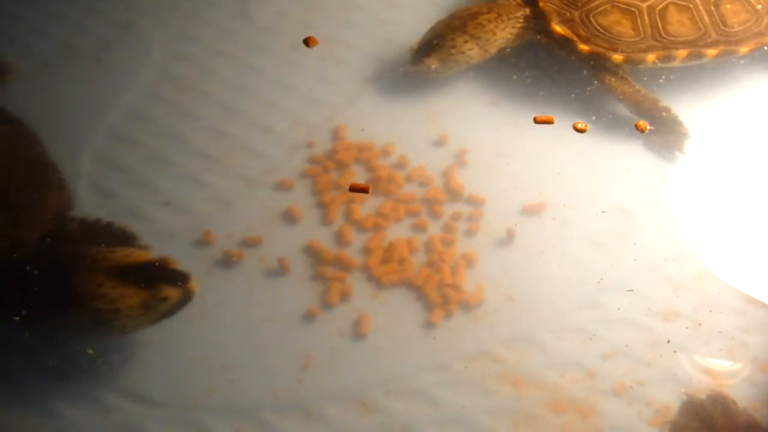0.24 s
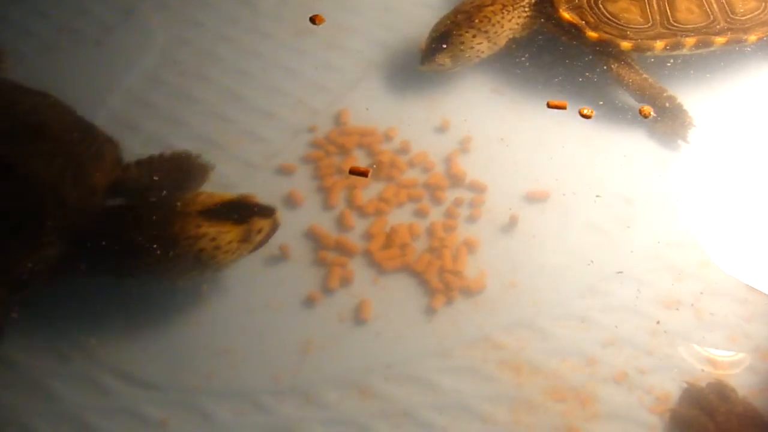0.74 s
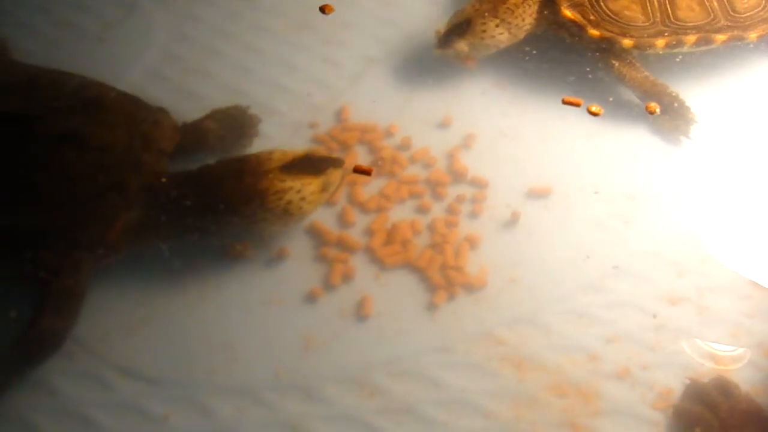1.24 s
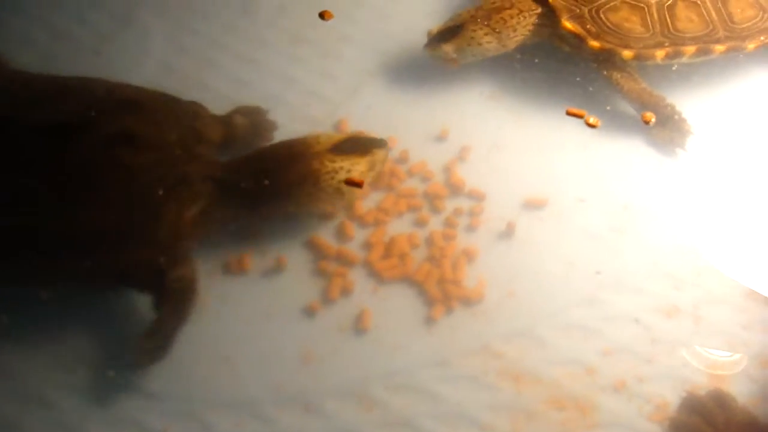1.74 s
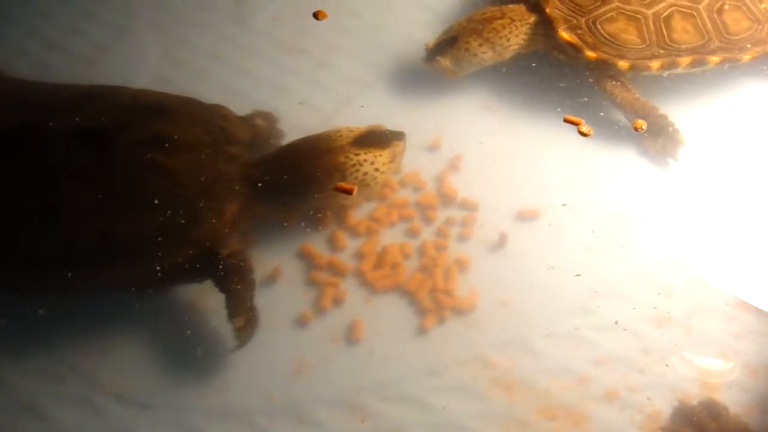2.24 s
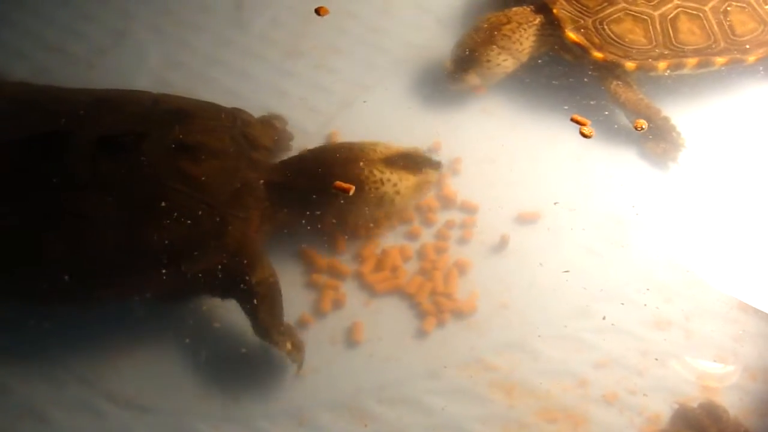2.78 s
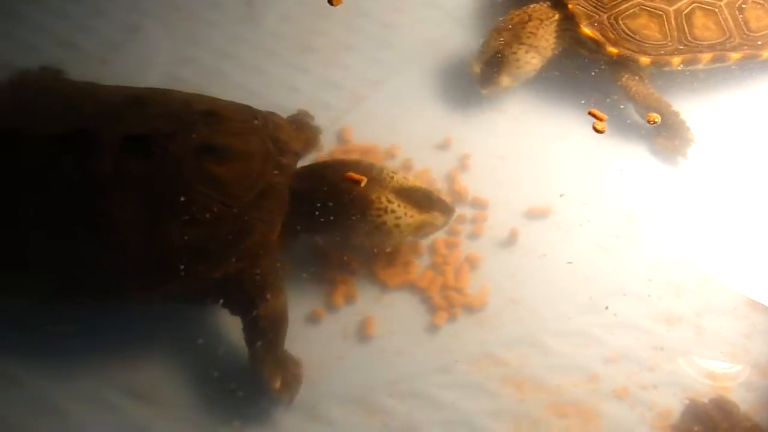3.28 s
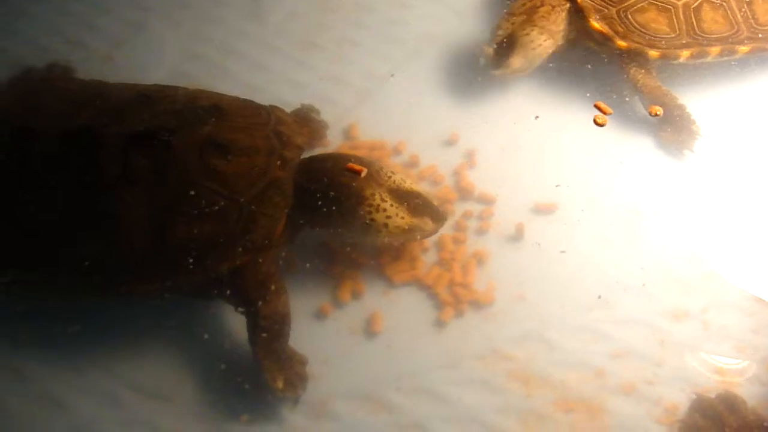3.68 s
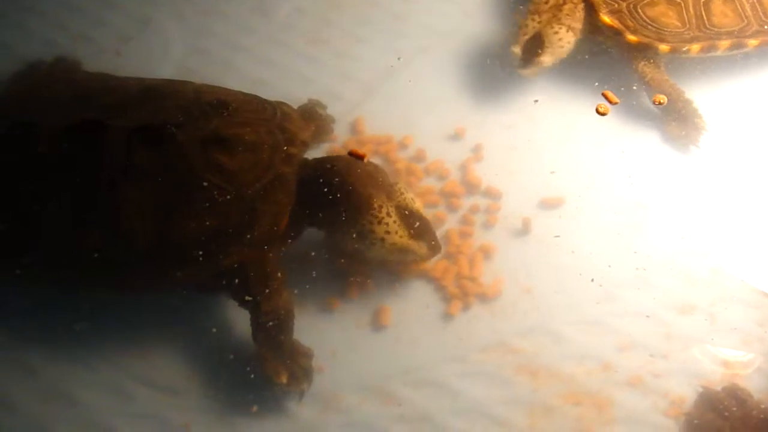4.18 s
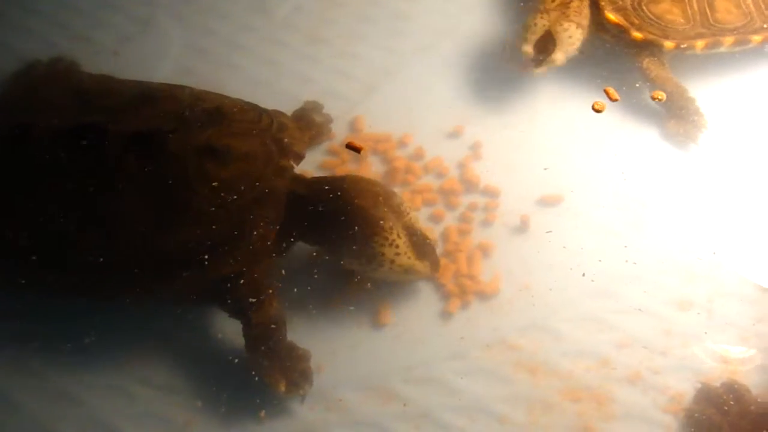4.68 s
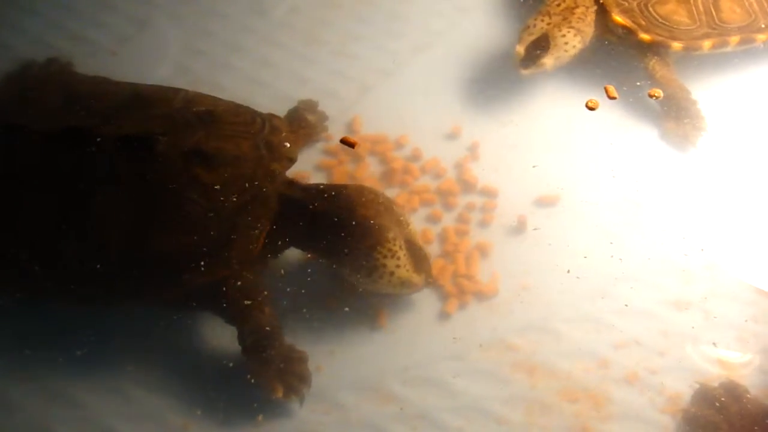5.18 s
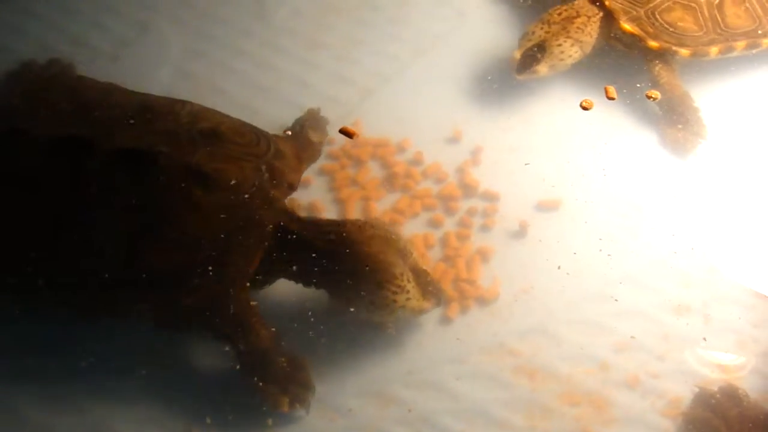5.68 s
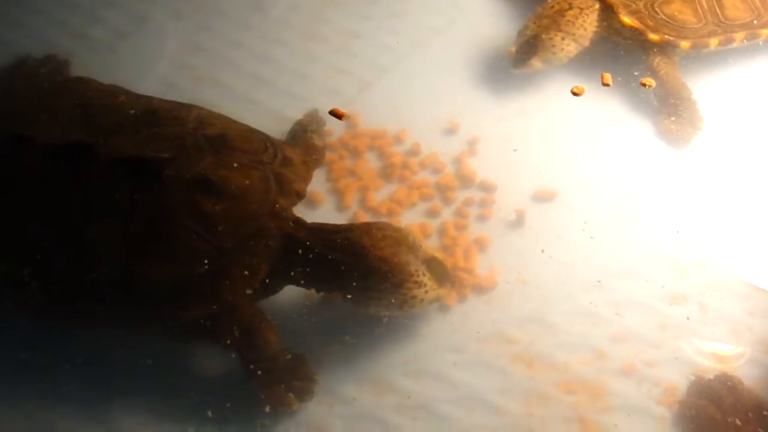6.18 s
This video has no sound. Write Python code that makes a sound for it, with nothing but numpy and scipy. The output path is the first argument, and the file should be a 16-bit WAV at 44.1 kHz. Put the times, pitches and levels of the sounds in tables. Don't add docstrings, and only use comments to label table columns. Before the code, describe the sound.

Close-up trickling, splashing water full of small bubbles, scattered plops and sharp little slaps echoing briefly in a tub, a pump humming quietly behind.

```python
import sys
import numpy as np
from scipy import signal
from scipy.fft import rfft, irfft, next_fast_len
from scipy.io import wavfile
from scipy.ndimage import uniform_filter1d, map_coordinates

SR = 44100
rng = np.random.default_rng(int(sys.argv[2]) if len(sys.argv) > 2 else 0)


def voltage_ratio(level):
    return 10 ** (np.asarray(level, float) / 20)


def transcribe(signal):
    frames = np.atleast_2d(signal).T
    limited = np.clip(frames, -1, 1)
    pcm = np.round(limited * 32767).astype(np.int16)
    wavfile.write(sys.argv[1], SR, pcm)


N = 283563


def along(points, hz):
    f, v = np.transpose(points)
    return np.interp(np.log(hz + 1), np.log(f + 1), v)


def unit(x):
    return x / np.sqrt(np.mean(x ** 2) + 1e-20)


def wobble(rate_hz):
    knots = rng.standard_normal(int(N * rate_hz / SR) + 4)
    return map_coordinates(knots, [np.arange(N) * rate_hz / SR])


def filtered(x, response):
    m = next_fast_len(N + 8192)
    return irfft(rfft(x, m) * response(np.fft.rfftfreq(m, 1 / SR)), m)[..., :N]


def rush(spectrum, patchy_db, wide_bins=4, long_frames=12):
    z = signal.stft(rng.standard_normal(N + 512), nperseg=256)[2]
    field = uniform_filter1d(rng.standard_normal(z.shape), size=wide_bins, axis=0)
    field = uniform_filter1d(field, size=long_frames, axis=1)
    x = signal.istft(z * voltage_ratio(patchy_db * unit(field)), nperseg=256)[1][:N]
    return unit(filtered(x, lambda hz: voltage_ratio(along(spectrum, hz))))


def drops(rows, echo_db, rise, size=4096):
    start_s, peak_db, pitch_hz, cycles, t60_s, slap_db = np.transpose(rows)[:, :, None]
    late_s, early_s, early_db = .0008, .007, -6
    t = np.arange(size) / SR

    age = np.minimum(pitch_hz * t / np.clip(cycles, 1, 30), 4)
    bubble = np.sin(2 * np.pi * pitch_hz * t * (1 + rise * (age - .5)))
    bubble = bubble * age ** .5 * np.exp(-2 * age) * (age < 4)
    bubble /= np.abs(bubble).max(axis=1, keepdims=True)
    u = t / .00004
    slap = 3 * voltage_ratio(slap_db) * (1 - u) * np.exp(-u)
    source = bubble + slap

    decay_db = -60 * t / np.clip(t60_s, .02, .3)
    dying = voltage_ratio(decay_db) + voltage_ratio(0.5 + 0.16 * decay_db) * (1 - t / t[-1])
    dying = dying * (1 + voltage_ratio(early_db) * np.exp(-(t / early_s) ** 4))
    echoes = rng.standard_normal((len(start_s), size)) * dying * (1 - np.exp(-t / 0.00037))
    clumps = np.repeat(rng.standard_normal((len(start_s), size // 128)), 128, axis=1)
    echoes *= voltage_ratio(2.2 * clumps)
    echoes *= voltage_ratio(echo_db) / np.linalg.norm(echoes, axis=1, keepdims=True)
    echoes[:, 0] = 1

    def strength(v):
        return np.linalg.norm(v, axis=1, keepdims=True)

    sound = irfft(rfft(source) * rfft(echoes))
    sound *= voltage_ratio(peak_db) * strength(source) * strength(echoes) / strength(sound)
    at = np.round(np.clip(start_s + late_s, 0, None) * SR).astype(int) + np.arange(size)
    return np.bincount(at.ravel(), sound.ravel(), N + size)[:N]


def fizz(count, spread_db, cycles, t60_s, slap_db):
    # pitch_hz, level_db
    sizes = [(400, -13.5), (1000, -1.5), (2500, 4.5), (4500, 9.5), (7000, 11.5), (10500, 7.5)]
    when, size, loud, life = rng.random((count, 4)).T
    pitch_hz = 400 * (10500 / 400) ** size
    level_db = along(sizes, pitch_hz) - spread_db * np.log(loud + .15)
    life_cycles = cycles * (0.36 + 2 * life ** 2)
    same = np.ones(count)
    rows = np.transpose([when * N / SR, level_db, pitch_hz, life_cycles, t60_s * same, slap_db * same])
    return unit(drops(rows, echo_db=5.5, rise=0.034, size=2048))


def walls(x, echo_db, t60_s):
    t = np.arange(SR // 4) / SR
    path = rng.standard_normal(len(t)) * voltage_ratio(-60 * t / t60_s) * (t > .008)
    return x + voltage_ratio(echo_db) * signal.fftconvolve(x, path / np.linalg.norm(path))[:N]


def tub(hz):
    # centre_hz, width_hz, level_db over the flat path
    modes = [(1245, 110, -3.5), (1820, 140, -13.5), (2260, 250, -12), (4100, 1030, -10.5),
             (6270, 3300, -34)]
    return 1 + sum(voltage_ratio(db) * 1j * hz * w / (c * c - hz * hz + 1j * hz * w) for c, w, db in modes)


def stream():
    # start_s, strength_db
    flow = [(0.0, -35.5), (1.23, -34.5), (1.59, -34), (2.09, -34.5), (3.08, -34), (4.21, -37),
            (4.49, -35.5), (4.94, -35), (5.14, -36), (6.05, -35), (6.43, -33.5)]
    # freq_hz, density_db [dB per Hz]
    gurgle_spectrum = [(320, -27), (550, -3.5), (601, -8), (825, -2.5), (1250, -0.5), (1510, -3),
                       (1770, -0.5), (2380, -1.5), (3200, -4.5), (4160, -10), (7040, -120)]
    # freq_hz, density_db [dB per Hz]
    splash_spectrum = [(1470, -39), (2500, -4), (6620, 1), (9020, -3.5), (10700, -7), (13900, -36),
                       (22000, -120)]

    start_s, strength_db = np.transpose(flow)
    swell_db = np.interp(np.arange(N) / SR, start_s, strength_db - strength_db.mean())
    gurgle_db = -39 + 0.63 * swell_db - 2.5
    splash_db = -37 + 0.9 * swell_db - 2.5 + 1.6 * wobble(14)
    gurgle = voltage_ratio(gurgle_db) * rush(gurgle_spectrum, patchy_db=2.5)
    splash = voltage_ratio(splash_db) * rush(splash_spectrum, patchy_db=2.0, wide_bins=24, long_frames=5)
    crowd = voltage_ratio(-43.5) * fizz(count=1300, spread_db=1.9, cycles=4.7, t60_s=0.086, slap_db=-8.0)
    return filtered(walls(gurgle + splash, echo_db=-9.5, t60_s=0.16) + crowd, tub)


def kind(rows, gain_db, cycles, t60_s, echo_db, rise, slap_db=0):
    start_s, peak_db, pitch_hz, *own_slap_db = np.transpose(rows)
    same = np.ones(len(start_s))
    life_cycles = cycles * voltage_ratio(1.25 * rng.standard_normal(len(start_s)))
    slaps_db = (slap_db + sum(own_slap_db)) * same
    full = np.transpose([start_s, peak_db, pitch_hz, life_cycles, t60_s * same, slaps_db])
    return voltage_ratio(gain_db) * drops(full, echo_db, rise)


def singles():
    # start_s, peak_db, pitch_hz
    glugs = [(0.318, -21.5, 472), (0.636, -24.5, 403), (0.691, -29, 434), (1.628, -41, 467),
             (2.12, -35, 415), (2.228, -45, 494), (3.193, -29, 346), (3.282, -47, 511), (3.573, -30, 470),
             (3.672, -31, 480), (3.972, -26, 502), (4.278, -37, 407), (4.568, -29, 480), (4.733, -31, 473),
             (4.873, -26.5, 494), (5.06, -27, 415), (3.35, -27.5, 520), (6.09, -36, 440), (1.83, -32, 410),
             (5.042, -25, 463), (5.191, -24, 487), (6.309, -27, 363)]
    # start_s, peak_db, pitch_hz
    plops = [(0.025, -28, 1260), (0.417, -30, 1200), (0.517, -16.5, 1245), (0.538, -28, 1300),
             (0.562, -23, 1187), (1.043, -27, 1190), (1.144, -30, 1240), (1.175, -26, 1160),
             (1.513, -26, 1250), (1.545, -19.5, 1220), (1.784, -26, 1210), (1.903, -24, 1200),
             (2.257, -22, 1210), (2.278, -28, 1030), (2.773, -27, 1200), (3.118, -29, 1250),
             (3.303, -26, 1240), (3.346, -27, 1240), (3.563, -19, 1164), (3.947, -26.5, 1044),
             (4.126, -29, 1240), (4.177, -26.5, 1240), (5.117, -21.5, 1204), (5.583, -22, 1150),
             (5.718, -32, 1110), (5.856, -25, 1190), (5.902, -23, 1520), (5.989, -26, 1280),
             (6.017, -22, 1230), (6.317, -22, 1240),
             (0.1491, -37, 1350), (0.312, -29, 1250), (0.5921, -27, 1284), (1.349, -26, 1400),
               (2.2922, -31, 1260), (2.6623, -30, 1260), (2.8574, -28, 1240), (2.9697, -26, 1260),
               (4.8549, -28, 1270), (5.299, -28, 1260), (5.557, -25, 1175), (0.53, -27, 1330),
               (0.575, -28, 1250), (5.81, -31, 1260), (6.335, -28, 1250)]
    # start_s, peak_db, pitch_hz
    blips = [(0.2046, -27, 2520), (0.2428, -25.5, 2200), (0.5177, -29, 2220), (0.713, -21, 2740),
             (1.0064, -25, 2750), (1.2848, -15, 2630), (1.3, -26, 2670), (3.797, -27, 3020),
             (1.5349, -26, 2220), (1.7105, -32, 1870), (1.823, -30, 1750), (2.4219, -33, 1860),
             (2.6643, -25, 2120), (2.794, -29, 2380), (2.9805, -43, 1860), (3.2076, -24, 2380),
             (3.5399, -24.5, 1920), (3.57, -28, 2200), (3.7269, -21.5, 2360), (3.789, -27, 2440),
             (3.8385, -41, 2480), (3.9404, -23.5, 2870), (4.121, -31, 2260), (4.4461, -24.5, 1900),
             (4.784, -28, 2390), (4.805, -27.5, 1850), (4.9616, -18.5, 2390), (5.2046, -25, 2400),
             (5.548, -26, 2320), (5.7181, -31, 2030), (5.9963, -28, 2250), (6.0526, -19, 2380),
             (0.156, -32, 1730), (1.2291, -33, 1800), (2.595, -31, 2230), (2.9133, -31, 2440),
             (3.4037, -27, 1760), (3.356, -28, 1850), (4.59, -32, 2070), (4.6553, -30, 2370),
             (4.9397, -37, 1740), (5.5, -31, 2140)]
    # start_s, peak_db, centre_hz
    smacks = [
        (0.0534, -13, 1700),
        (0.5172, -15, 5400),
        (0.8444, -22, 6410),
        (1.2855, -24, 2750),
        (4.6438, -24, 6470),
        (4.8544, -30, 4840),
        (4.9616, -23, 2350),
        (5.7184, -8.5, 2500),
    ]
    # start_s, peak_db, pitch_hz
    gulps = [(.655, -29.5, 877), (.87, -31, 974), (1.708, -32, 934), (1.999, -29.5, 760), (2.29, -30, 1030),
             (2.672, -29, 421), (4.685, -27, 906), (5.856, -30, 490), (5.93, -32, 480), (6.12, -33, 480),
             (1.36, -30, 490), (.9, -53, 490)]
    # start_s, peak_db, centre_hz, slap_db
    splashes = [(.635, -19, 3800, -11), (1.0, -17, 5000, -11), (1.3, -20, 2560, -6), (1.4, -26, 2200, -12),
                (2.11, -19, 5400, 8), (2.3, -33, 6500, -9), (2.4, -31, 5500, -3), (2.83, -17, 4800, 0),
                (3.02, -14, 5330, -7), (3.6, -15.5, 3960, -14), (3.79, -18.5, 3450, 2),
                (4.38, -18, 4570, 2), (4.53, -15, 5500, -13), (4.962, -15.5, 3170, -1),
                (5.27, -20, 6840, 3), (5.39, -17, 6800, -3), (5.47, -21, 4200, -12), (5.6, -25, 4300, -14),
                (5.08, -19, 2980, -13), (3.29, -17, 2410, -10), (5.736, -12.5, 4600, 2),
                (5.96, -36, 2540, -10), (6.04, -13, 2820, -20), (6.08, -19.5, 2330, -10),
                (4.495, -17, 6300, -8), (4.655, -16, 6800, -10), (4.87, -16, 4600, -6),
                (6.385, -18, 7000, -4), (5.85, -21, 6500, -10), (1.845, -19, 9000, -10),
                (.39, -17, 5000, -10)]
    # start_s, peak_db, pitch_hz
    plinks = [(0.0535, -31, 4000), (0.3716, -22, 4700), (1.0332, -22, 3920), (1.0887, -21, 4350),
              (1.1952, -29, 4150), (1.5389, -24, 4130), (1.6844, -25, 3920), (2.0148, -21, 4120),
              (2.4349, -31, 4170), (2.8513, -22.5, 3700), (2.9234, -23.5, 4100), (3.7865, -23, 3190),
              (4.3238, -21, 3280), (4.4747, -24, 3480), (4.815, -28, 4340), (4.8544, -23, 4700),
              (4.93, -29, 4120), (4.9607, -21.5, 4100), (5.252, -29, 3880), (5.3936, -41, 4070),
              (5.446, -24, 3940), (5.5059, -27.5, 4260), (5.5683, -24, 4160), (5.5897, -24, 4210),
              (5.72, -27, 4100), (5.793, -35, 3200), (5.8795, -32, 3370), (5.9586, -23.5, 3990),
              (6.2083, -22.5, 4000), (6.406, -29, 3770), (0.2688, -26, 3810), (0.4708, -31, 4000),
              (0.6365, -29, 3610), (0.9153, -31, 3110), (1.3438, -28, 4270), (2.0, -29, 3000),
              (2.9667, -28, 4000), (3.0255, -30, 3620), (3.5947, -27, 4040), (3.757, -30, 3950),
              (3.788, -25, 4050), (4.158, -28, 4080), (4.343, -33, 3200), (4.424, -31, 3200),
              (5.0235, -26, 3200), (5.296, -34, 4950), (5.482, -28, 4200), (5.535, -32, 4200)]
    # start_s, peak_db, pitch_hz, slap_db
    spits = [(0.087, -23.5, 6100, -17), (0.1276, -21, 6060, -21), (0.187, -21.5, 6270, -15),
             (0.319, -28, 5300, -6), (0.3716, -21, 5020, -3), (0.5068, -25.5, 6000, -4),
             (1.0896, -29, 5480, -9), (1.801, -25, 6200, 0), (1.855, -27, 4960, -12),
             (1.904, -22.5, 6560, -17), (2.2358, -24, 7740, -11), (2.3236, -24, 6890, -15),
             (2.355, -16, 6600, -18), (2.6045, -21, 7400, -3), (3.009, -27, 5660, -9),
             (3.0487, -22, 6700, -13), (3.2141, -24, 6400, -9), (3.6307, -30, 5200, -9),
             (3.7269, -32, 7420, -11), (3.8654, -20.5, 6000, -13), (4.153, -31, 5480, -9),
             (4.1799, -26, 5900, -3), (4.4842, -18.5, 6400, -6), (4.5087, -19, 6400, -13),
             (4.5845, -25, 7490, -1), (4.644, -18, 6540, -17), (4.8544, -21, 4900, -13),
             (4.961, -26, 6450, -9), (5.633, -24.5, 5200, -16), (6.128, -27, 7000, -14),
             (1.722, -25, 5700, -12), (6.1804, -25, 6700, -9), (0.2139, -26, 6960, -12),
             (0.26, -25, 6800, -6), (0.6419, -31, 5720, -10), (0.866, -31, 5700, -14),
             (1.1453, -28, 6560, -8), (1.4885, -27, 6600, -4), (3.9629, -27, 6500, -8),
             (5.278, -29, 6850, -12), (5.3807, -29, 7000, -14), (5.535, -33, 6500, -12)]
    # start_s, peak_db, pitch_hz, slap_db
    ticks = [(0.186, -36, 8680, -6), (0.2146, -26, 8350, -4), (0.328, -20.5, 10300, -10),
             (0.845, -19.5, 10600, -19), (1.343, -33, 9360, 5), (1.5284, -32, 8740, -8),
             (1.8267, -23, 8900, -8), (2.0257, -26.5, 8710, 2), (2.3241, -32, 8940, -11),
             (2.354, -26, 8360, -17), (2.4346, -27.5, 8000, 2), (2.5825, -25, 8730, -13),
             (2.6043, -23, 8700, -11), (2.829, -30, 8740, -8), (3.049, -27, 8500, -17),
             (3.424, -27, 8600, -6), (4.0337, -27, 8800, -14), (4.6443, -22, 8650, -24),
             (4.738, -24, 9700, -5), (4.8414, -23, 8390, -3), (5.4041, -28, 9000, -1),
             (5.6387, -29.5, 9860, -8), (6.1798, -23, 8300, -10), (6.3714, -25, 8500, -1),
             (0.8445, -28, 8300, -10), (2.59, -32, 8760, -12), (0.856, -32, 8500, -8)]

    return (kind(glugs, gain_db=-12.5, cycles=5.4, t60_s=.09, echo_db=4.5, rise=0.038, slap_db=-30)
            + kind(plops, gain_db=-9.5, cycles=7.7, t60_s=0.096, echo_db=1.5, rise=0.032, slap_db=-23)
            + kind(blips, gain_db=-6.5, cycles=5.5, t60_s=0.078, echo_db=5.5, rise=0.019, slap_db=-3.5)
            + kind(smacks, gain_db=-16.5, cycles=1.4, t60_s=0.056, echo_db=8.5, rise=.03, slap_db=-7)
            + kind(gulps, gain_db=-8.5, cycles=8.7, t60_s=0.13, echo_db=5.0, rise=0.044, slap_db=-25)
            + kind(splashes, gain_db=-13.5, cycles=3.8, t60_s=0.31, echo_db=9.5, rise=0.053)
            + kind(plinks, gain_db=-7, cycles=12.2, t60_s=0.13, echo_db=4.5, rise=0.017, slap_db=-7)
            + kind(spits, gain_db=-3, cycles=4.66, t60_s=0.085, echo_db=7.5, rise=0.053)
            + kind(ticks, gain_db=-1, cycles=2.66, t60_s=0.09, echo_db=9, rise=0.023))


def pump():
    # freq_hz, rms_db, unsteadiness_db
    hum_lines = [(87, -73, 2), (120, -60.8, .6), (218, -67, 2), (240, -62, 1), (360.5, -54.3, 4.5),
                 (436, -55.5, 2), (480, -56.5, 3), (491, -55, 4), (525, -63, 4)]
    # centre_hz, width_hz, depth [0-1]
    panel_dips = [(251, 7, .55), (280, 10, .4), (450, 10, .55), (393, 12, .2), (206, 12, .3)]
    # freq_hz, density_db [dB per Hz]
    rumble_spectrum = [(15, -72), (25, -51), (65, -40.5), (108, -26), (161, -13), (224, -7.5), (273, -9),
                       (353, 0), (401, -3.5), (489, 2.5), (589, -11), (750, -13), (980, -67), (1650, -120)]

    t = np.arange(N) / SR
    hum = np.zeros(N)
    for hz, rms_db, sway_db in hum_lines:
        level = voltage_ratio(rms_db + 3 + sway_db * wobble(11))
        hum += level * np.sin(2 * np.pi * hz * t + 0.24 * sway_db * wobble(5))

    def hollows(f):
        return np.prod([1 - deep / (1 + ((f - c) / w) ** 2) for c, w, deep in panel_dips], axis=0)

    return hum + voltage_ratio(-43) * filtered(rush(rumble_spectrum, patchy_db=0.0), hollows)


def scene():
    mono = stream() + singles() + pump()
    return np.array([mono, mono])


def roll_off(x):
    return signal.sosfilt(signal.butter(12, 13700, fs=SR, output="sos"), x)


def record(dry):
    edge_hz, bass_hz, first_rate_hz = 11010, 70, 24000
    kept = filtered(dry, lambda hz: (hz < edge_hz) / (1 + (bass_hz / (hz + 1)) ** 2))
    mirror = kept * np.cos(2 * np.pi * first_rate_hz * np.arange(N) / SR)

    def leak(hz):
        return voltage_ratio(-26.5 - 0.027 * (hz - 13000)) * (hz > 12990) * (hz < 13650)

    return roll_off(kept + filtered(mirror, leak))


dry = scene()
out = record(dry)
transcribe(out)
```